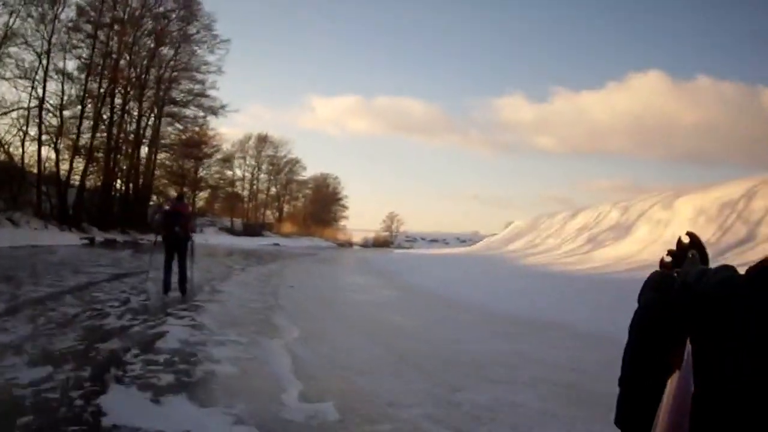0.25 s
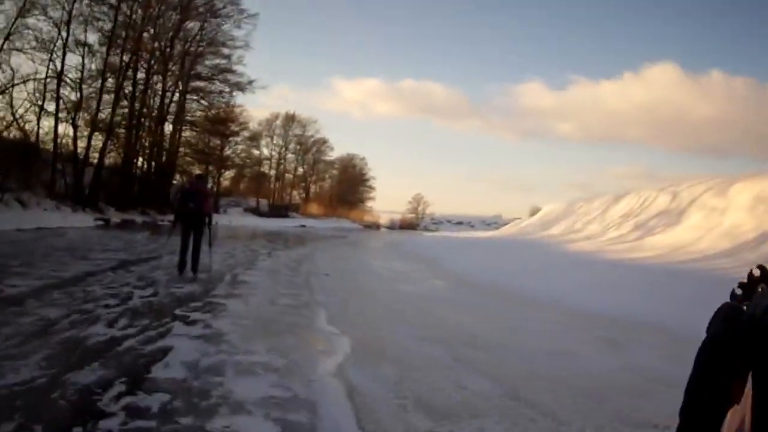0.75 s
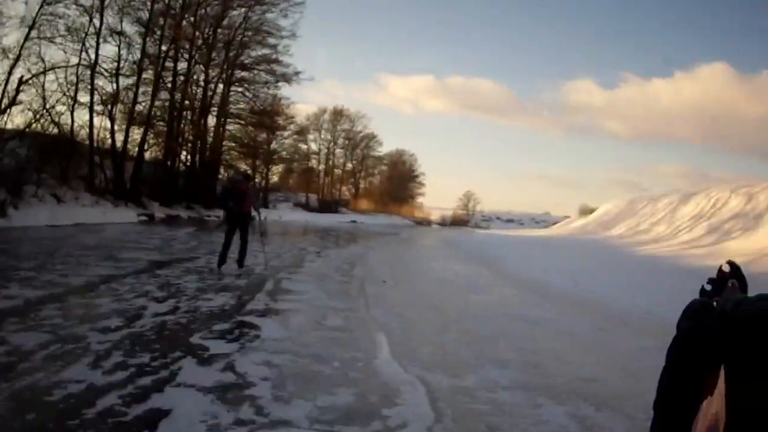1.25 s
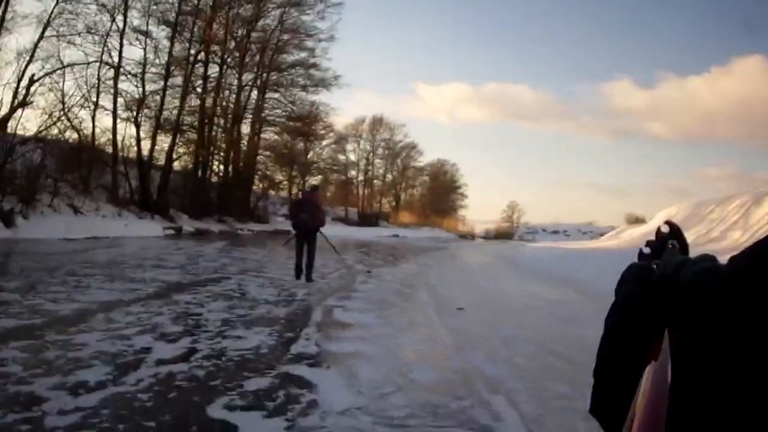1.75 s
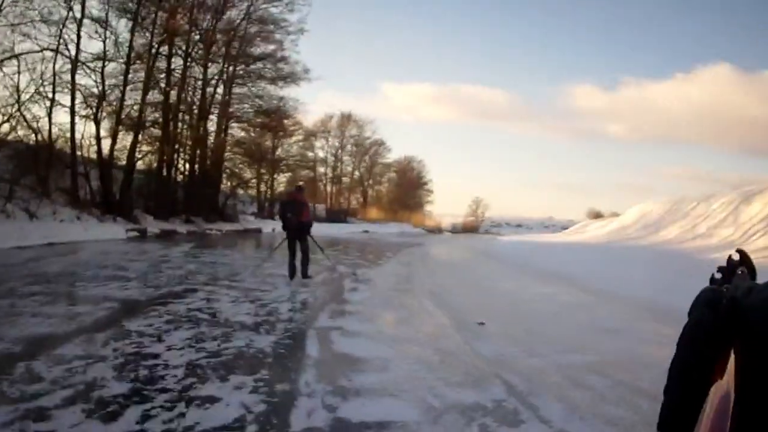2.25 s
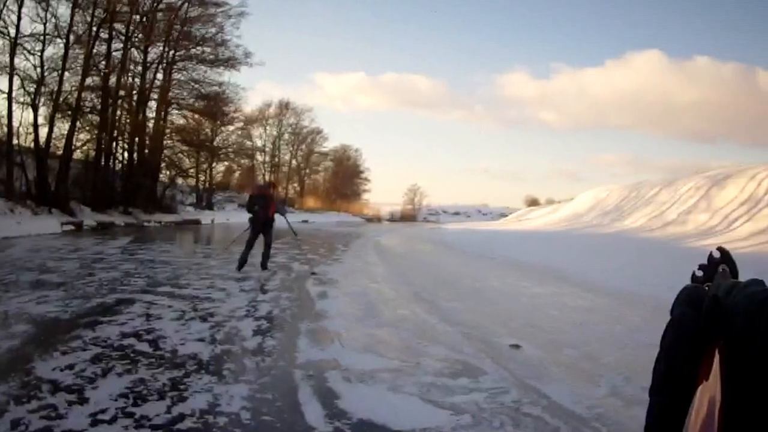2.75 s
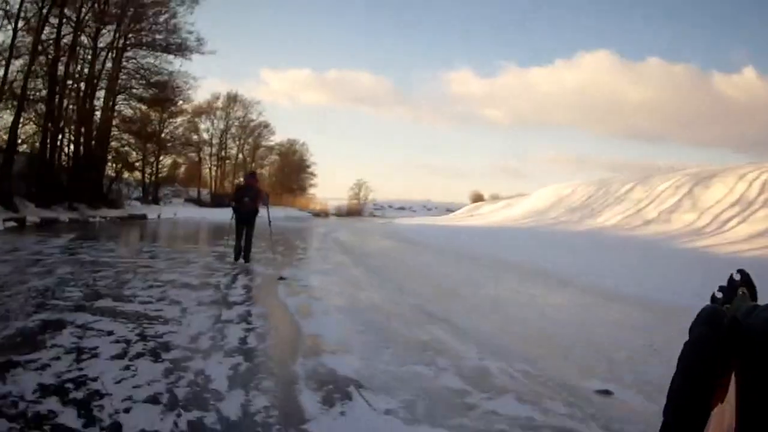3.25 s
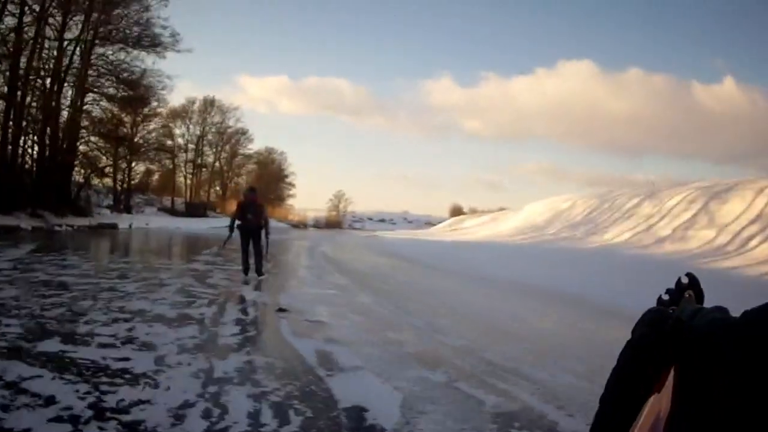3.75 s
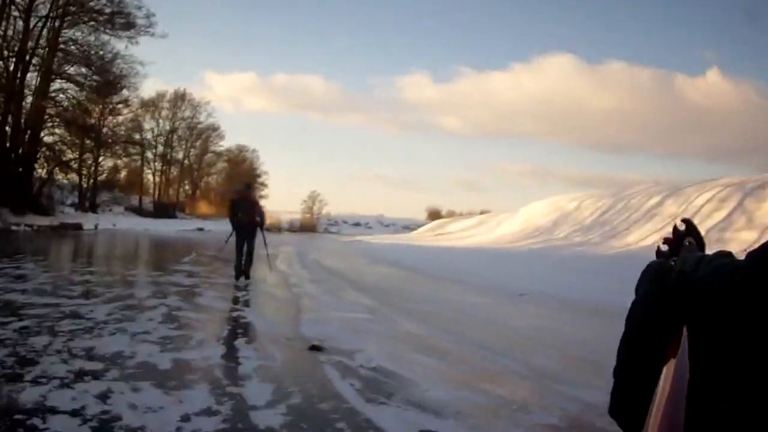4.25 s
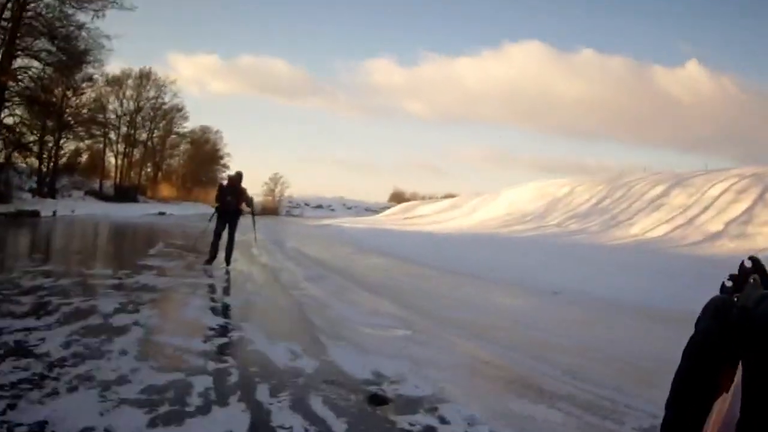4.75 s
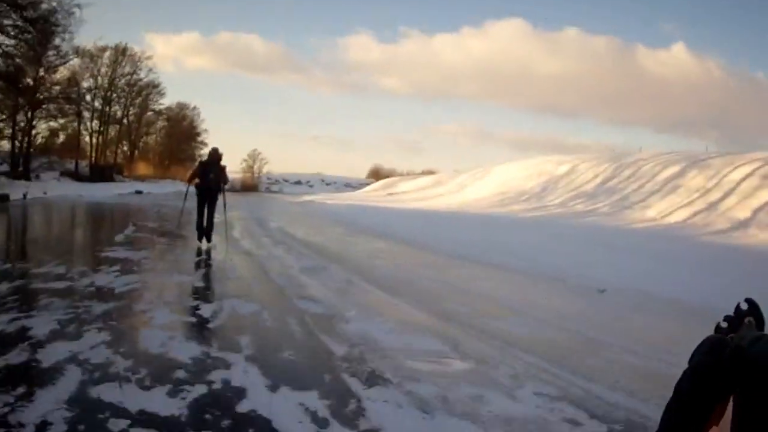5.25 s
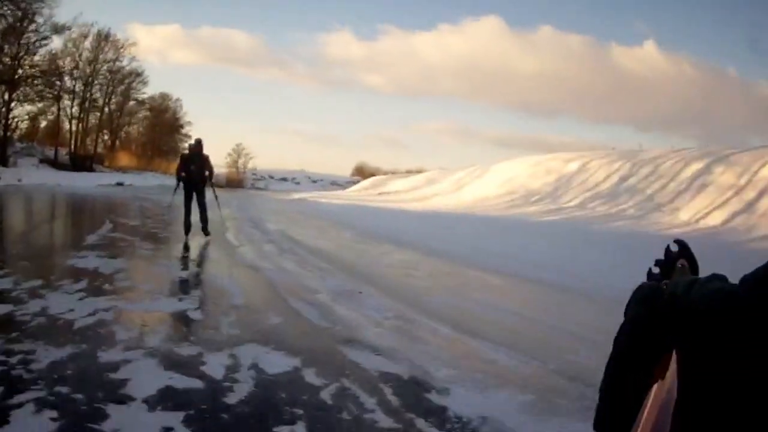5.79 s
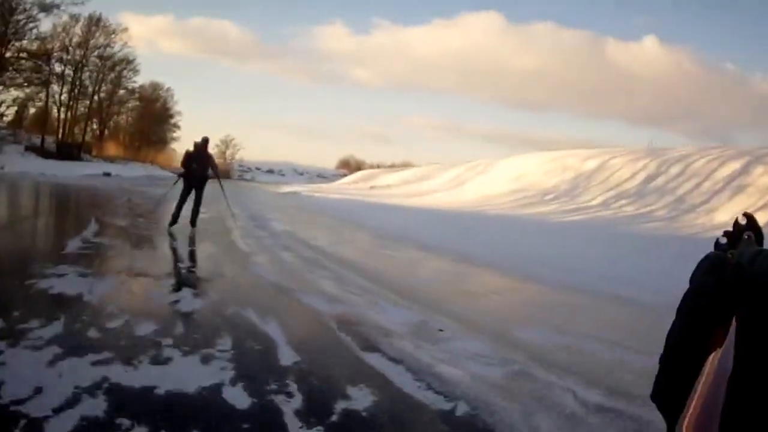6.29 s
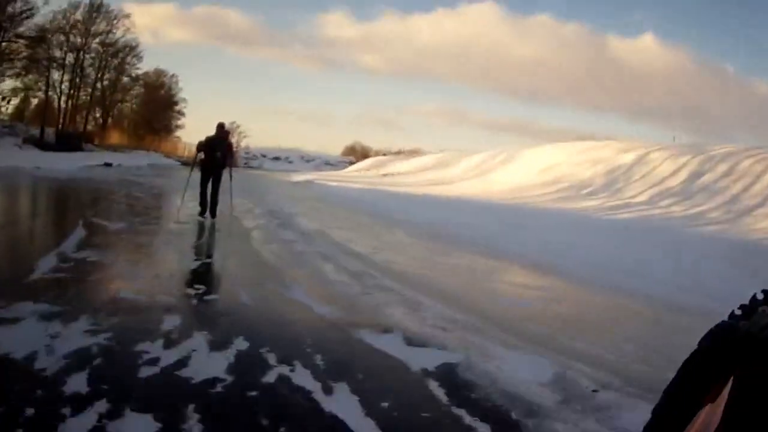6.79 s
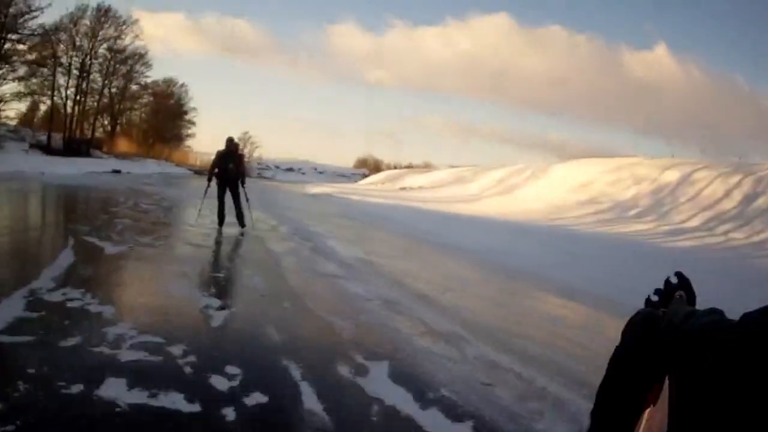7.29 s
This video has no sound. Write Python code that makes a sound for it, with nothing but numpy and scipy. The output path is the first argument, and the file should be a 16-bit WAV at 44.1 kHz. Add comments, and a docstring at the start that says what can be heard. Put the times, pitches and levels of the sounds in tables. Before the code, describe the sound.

Skate blades scrape and glide over ice with sharp pole and blade clicks, above a steady low electrical buzz and hiss.

```python
"""Skates grind and glide over river ice, heard through a small action camera's closed case.
The steel edges crush ice grains, which ring the case; now and then an edge squeaks.
Blades and pole tips tick on the ice sheet, and a boot stamps once.
Behind them: the camera circuits' frame-rate buzz and thin whine, and steady hiss."""
import sys
import numpy as np
from scipy import signal
from scipy.fft import rfft, irfft
from scipy.io import wavfile
from scipy.ndimage import uniform_filter1d

SR = 44100
rng = np.random.default_rng(int(sys.argv[2]) if len(sys.argv) > 2 else 0)


def dump_mix(stems):
    """Bounce the given channels to the path in sys.argv[1] as a 16-bit WAV at rate SR."""
    frames = np.atleast_2d(stems).T  # one column per channel
    limited = np.clip(frames, -1, 1)  # hard clip at full scale
    pcm = np.round(limited * 32767).astype(np.int16)
    wavfile.write(sys.argv[1], SR, pcm)


N = 332073
T = np.arange(N) / SR

# Hiss spectrum. Each row: frequency in Hz, relative density in dB.
HISS_SPECTRUM = [(20, 17.5), (33, 4), (50, 3), (200, 8), (700, -8.5), (1100, -12.5), (2000, -3),
                 (3000, -20.5), (6500, -14), (9000, -21), (11000, -3.5), (12500, -14), (15000, -17)]
# Steady circuit tones. Each row: frequency in Hz, rms level in dB.
CIRCUIT_TONES = [(46.9, -68), (53.1, -67), (11089.6, -74)]
# Current bursts over a three-frame cycle. Each entry: length in seconds; below, its jitter in seconds.
BURST_S = [0.0018, 0.00417, 0.0016]
BURST_JITTER_S = [0.00031, 0.000089, 0.00016]
# Current steps closing a burst. Each row: offset from its end in seconds, share of the mean load.
CLOSING_STEPS = [(-.0007, 0.26), (0, -0.55)]
# Blade and pole blows. Each row: start in seconds, case peak in dB, ice ring in dB re case,
# ice ring in Hz, crack in dB re case.
BLOWS = [(.0114, -50, 3, 1170, -7), (.0333, -47, -4, 990, -13), (.0865, -36, 2, 1470, -6),
         (.1181, -46, -15, 1040, -4), (.2184, -38, -21, 1260, -14), (.2648, -41.5, -19, 837, -14),
         (.3092, -36, -8, 1610, -4), (.3534, -41.5, -13, 1490, -16), (.6898, -41.5, -19, 961, -9),
         (.7916, -47, -17, 1020, -16), (.8274, -49, 6, 1650, -17), (.8535, -40, -8, 1540, -6),
         (.9168, -35.5, -1.5, 1460, -4), (.9393, -43, -21, 961, -18), (1.1564, -44, -3, 1450, -14),
         (1.1822, -41.5, -13, 1530, -11), (1.7364, -40, -1.5, 1530, -17), (1.9619, -49.5, 5, 1640, -15),
         (2.0223, -40.5, -4, 1130, -8), (2.0892, -50, 3, 980, -10), (2.262, -56, -9, 1070, 3),
         (2.2842, -47, -4, 1070, 0), (2.4099, -47.5, 1.5, 1090, -12), (2.4623, -45, -2, 1650, 3.5),
         (2.566, -45, -1, 1640, 0), (2.5774, -45.5, -30, 894, 7), (2.7711, -52.5, 6, 1490, -19),
         (2.9986, -43, -18, 1010, 7.5), (3.027, -47, -16, 1280, -1), (3.2395, -50, -15, 1340, -11),
         (3.4516, -33, -19, 1530, -9), (3.707, -41, -13, 1250, -6), (4.099, -50, -15, 960, 0),
         (4.1334, -50.5, 2, 958, -16), (4.2268, -46.5, -21, 823, -2), (4.4742, -47, -3, 1110, -7),
         (4.9377, -45, -20, 848, -14), (4.9724, -44.5, 1.5, 1060, -11), (5.02, -45, -15, 1040, -14),
         (5.0654, -57, -20, 910, 12), (5.2085, -39, -21, 1370, -6), (5.3911, -50, -8, 980, 8.5),
         (5.4655, -43.5, -12, 1060, -16), (5.5149, -45.5, -11, 850, 0), (5.8626, -49, 7.5, 1610, 0),
         (5.9125, -43.5, -8, 1610, -6), (5.9743, -36.5, -11, 1630, -3), (6.0354, -42, -8, 1210, -1),
         (6.0564, -47, -17, 910, 0), (6.1554, -49, -6, 890, 4), (6.2018, -37.5, -16, 1200, -2),
         (6.5051, -29, -18, 1650, 6), (6.5296, -25, -12, 1670, -10), (6.6413, -22, -23, 1610, -4),
         (6.8294, -38, -17, 1510, 4), (6.9144, -40, -1, 1610, -2), (6.941, -33, -9, 1000, 11),
         (7.3118, -44, -0.5, 1630, -3)]
# Edge squeaks. Each row: start in seconds, length in seconds, pitch in Hz, rms level in dB.
EDGE_SQUEAKS = [(0.802, 0.068, 4900, -77), (1.395, 0.033, 2750, -66), (1.68, .05, 4900, -69),
                (4.1, .025, 4950, -71), (5.725, 0.05, 4760, -62)]
# Running blades. Each row: time in seconds, mid ring in dB, low ring in dB re mid.
GLIDE_LEVELS = [(0.0, -68, 4), (0.33, -65, 5), (0.88, -74, 9), (1.15, -67.5, 8), (1.4, -76, 3),
                (1.76, -65.5, 5), (1.93, -75, 7), (2.35, -71.5, 2), (2.93, -74, 11), (3.29, -69, 4),
                (4.32, -78, 5), (5.08, -71, 9.5), (5.2, -76, 5), (6.02, -80, 14.5), (6.33, -69, 1),
                (6.63, -65.5, 5.5), (7.26, -74, 9.5), (7.53, -65, 4)]
# Edge scrapes. Each row: time of full bite, rise, hold and fall in seconds, mid gain in dB,
# then body, low and top gain in dB re mid.
SCRAPES = [(.002, .01, .003, 0.035, -60, -15, 3, 1.5), (0.186, 0.061, .003, 0.061, -53, -10, 3, -5.5),
           (0.447, .015, 0.094, 0.038, -61.5, -15, 5.5, -1), (0.603, .05, 0.093, .025, -70, -13, 2, -10),
           (0.929, .02, 0.039, 0.088, -60, -3, 10, -2.5), (1.107, 0.16, 0.03, 0.036, -51, -5.5, 8, -6.5),
           (1.183, 0.0042, .003, 0.009, -53, -8, -5, -12), (1.286, 0.073, 0.07, 0.011, -47.5, -8, 9, -4),
           (1.391, 0.033, 0.0024, 0.019, -54, -5, -2, 0), (1.484, 0.05, .07, .03, -64.5, -8, 5.5, -3),
           (1.586, 0.019, 0.027, 0.085, -55, -9, 2.5, -4.5), (1.76, 0.14, 0.027, 0.055, -59, -12, 7.5, 0),
           (1.874, 0.058, 0.022, .035, -57, -7, 3.5, -1), (2.095, 0.017, .003, .06, -58, -11, 2, 0.5),
           (2.197, 0.033, .003, 0.12, -54.5, -11, 4, -4.5), (2.33, 0.068, 0.056, 0.015, -52, -5.5, 5, -4),
           (2.462, 0.068, .003, 0.041, -65.5, -11, 11.5, -6), (2.6, 0.047, 0.023, 0.033, -65, -3, 6.5, -4),
           (2.66, 0.021, 0.032, 0.043, -50.5, -8, 1, -7.5), (2.9, 0.04, 0.053, .05, -60.5, -7, 6.5, -6),
           (3.024, 0.024, 0.0027, 0.024, -48.5, -6.5, 1, -14), (3.131, 0.025, .03, 0.072, -51, -6, 4, -3),
           (3.264, 0.044, 0.033, 0.048, -50, -3, 7.5, -4), (3.388, 0.02, 0.018, 0.06, -56.5, -2, 8, -1),
           (3.458, 0.057, 0.029, 0.039, -45, -3.5, 4, -5), (3.577, 0.024, 0.038, 0.038, -63, 3, 6.5, -5),
           (3.72, 0.045, 0.0019, 0.067, -56.5, -1, 8, -6.5), (3.864, 0.042, .05, 0.13, -45, -7.5, 1.5, -9),
           (3.991, 0.12, 0.048, 0.0087, -51.5, -11, 2, -1.5),
           (4.564, 0.029, 0.053, .08, -60.5, -23, -2.5, -8),
           (4.795, .007, 0.043, .03, -35, -16.5, -0.5, -11.5),
           (4.849, 0.034, 0.0097, 0.019, -44.5, -17, -6, -11),
           (5.075, 0.016, 0.054, 0.17, -60.5, -4, 4.5, -3.5),
           (5.211, 0.031, 0.02, 0.033, -39, -10.5, 0, -9.5),
           (5.256, 0.035, .035, 0.031, -46.5, -7, -0.5, -6.5), (5.308, .05, .003, 0.15, -58.5, -2.5, 6, -6),
           (5.568, .065, 0.022, 0.24, -55.5, -5, 4, -5), (5.73, 0.092, 0.058, 0.027, -77, 9, -8, 12.5),
           (6, 0.03, .003, 0.024, -46.5, -9.5, 2, -5.5), (6.2, .06, 0.12, 0.097, -73, -12, 2, -6),
           (6.336, 0.17, 0.011, 0.024, -63, -16, -1, -9), (6.409, 0.062, 0.032, .04, -54, -12, -1, -12),
           (6.47, 0.02, .02, 0.054, -41, -11, -2.5, -10.5),
           (6.511, 0.019, 0.029, 0.043, -35.5, -14.5, 2, -10.5),
           (6.579, 0.056, 0.039, .04, -44.5, -10.5, 6, 1.5),
           (6.627, 0.029, 0.027, 0.029, -34, -16.5, 2, -10),
           (6.75, 0.012, 0.015, 0.072, -51.5, -28, -7, -8.5),
           (6.827, 0.064, 0.0028, 0.02, -51.5, -9, 5.5, -0.5),
           (6.922, 0.034, 0.027, 0.065, -41, -15, -2, -4),
           (6.934, 0.015, 0.0075, 0.0078, -27.5, -17, -4.5, -12.5),
           (7.046, .05, 0.036, 0.055, -63.5, -18, 2, -5), (7.16, .015, 0.023, 0.025, -64, -8, 4, -7),
           (7.23, 0.04, .003, .06, -56, -10, 6, -2), (7.457, 0.074, 0.082, .05, -72.5, -15, 6, -6)]
# Case resonances in five ascending bands. Each row: centre in Hz, width in Hz, relative gain in dB.
BODY_MODES = [(1280, 315, 6.5), (1030, 240, -2.5), (643, 610, -4)]
LOW_MODES = [(1745, 324, -3), (1977, 266, 6), (2283, 460, -5.5)]
MID_MODES = [(2780, 400, -6.5), (3208, 490, 0.5), (3734, 310, -0.5), (4180, 600, -8.5)]
HIGH_MODES = [(5006, 310, -1), (5436, 280, -1.5), (5910, 290, 2), (6426, 320, -5), (7370, 620, -2)]
TOP_MODES = [(8450, 1300, -2), (9860, 1100, -0.5), (10850, 1200, -3.5), (12160, 860, -8.5),
             (13300, 830, -3.5), (14600, 700, -7)]
# Hard push-offs. Each row: start in seconds, end in seconds.
PUSH_OFFS = [(4.75, 4.95), (6.25, 7.1)]
# Case resonances in a push-off. Each row: centre in Hz, width in Hz, relative gain in dB.
PUSH_BODY_MODES = [(1350, 690, 2.5), (656, 350, -4)]
PUSH_LOW_MODES = [(1898, 300, 1), (2352, 250, -1.9)]
PUSH_MID_MODES = [(2710, 1800, -2.5), (3437, 380, 5), (3920, 1100, -15.5)]
PUSH_HIGH_MODES = [(5260, 800, 8), (5950, 270, -3.5), (6840, 1400, -1)]
PUSH_TOP_MODES = [(8290, 1040, 0.5), (10150, 1600, -0.5), (11000, 960, -0.5), (13200, 4400, -4)]

GRAINS_PER_S, GRAIN_SCATTER_DB = 7000, 3.5


def undb(db):
    return 10 ** (np.asarray(db) / 20)


def at_rms(x, db):
    return x * undb(db) / np.sqrt(np.mean(x ** 2))


def unit_peak(x):
    return x / np.abs(x).max()


def wander(rate_hz):
    """Random levels joined by ramps; spread near 1."""
    hold = int(SR / rate_hz)
    return uniform_filter1d(np.repeat(rng.standard_normal(N // hold + 1), hold), hold)[:N]


def resonate(x, hz, width_hz):
    """One resonance, unity gain at its centre."""
    return signal.lfilter(*signal.iirpeak(hz, hz / width_hz, SR), x)


def ring(x, modes, wander_db=0):
    """Resonator bank, normalised for white noise; two passes per mode keep the valleys dark."""
    impulse = signal.unit_impulse(4096)
    out = response = 0
    for k, (hz, width_hz, db) in enumerate(modes):
        gain = (-1) ** k * undb(db)
        drive = x * undb(wander_db * wander(13)) if wander_db else x
        out += gain * resonate(resonate(drive, hz, width_hz), hz, width_hz)
        response += gain * resonate(resonate(impulse, hz, width_hz), hz, width_hz)
    return out / np.sqrt(np.sum(response ** 2))


def grains(per_s, scatter_db):
    """Random clicks, a few much larger than the rest."""
    occur, polarity, size = rng.random((3, N))
    excess = np.minimum(-np.log(1 - size), 4)
    return (occur < per_s / SR) * np.sign(polarity - .5) * undb(scatter_db * excess)


def hiss(rms_db=-59.5):
    """Steady noise of microphone and air."""
    hz, db = np.transpose(HISS_SPECTRUM)
    bin_hz = np.maximum(np.fft.rfftfreq(N, 1 / SR), 1)
    shape = undb(np.interp(np.log(bin_hz), np.log(hz), db))
    return at_rms(irfft(rfft(rng.standard_normal(N)) * shape, N), rms_db)


def whine(scan_hz=7867.15, flip_hz=30.025, scan_db=-66.5):
    """A scan tone that flips sign every field, twice per flip cycle, plus steady tones."""
    flip = np.tanh(30 * np.sin(2 * np.pi * flip_hz * T)) + 0.17
    scan = resonate(flip * np.sin(2 * np.pi * scan_hz * T), 8400, 700)
    tones = sum(np.sqrt(2) * undb(db) * np.sin(2 * np.pi * hz * T) for hz, db in CIRCUIT_TONES)
    return at_rms(scan, scan_db) + tones


def buzz(frame_hz=59.944, first_end_s=.0151, release_s=.00088, coupling_hz=68, rms_db=-49):
    """Supply current bursts once a frame and leaks in through the input's coupling capacitor."""
    frame = np.arange(int(N / SR * frame_hz) + 1)
    end_draw, start_draw, load_draw = rng.standard_normal((len(frame), 3)).T
    end_s = first_end_s + frame / frame_hz + .00005 * end_draw
    start_s = end_s - np.take(BURST_S, frame % 3) + np.take(BURST_JITTER_S, frame % 3) * start_draw
    load = 1 + 0.13 * load_draw
    closing = [(end_s + offset_s, share) for offset_s, share in CLOSING_STEPS]
    remaining = load + sum(share for _, share in CLOSING_STEPS)
    steps = np.zeros(N + SR)
    for at_s, size in [(start_s, load), (end_s + release_s, -remaining)] + closing:
        np.add.at(steps, (at_s * SR).astype(int), size)
    current = np.cumsum(steps)[:N]
    leak = signal.lfilter(*signal.butter(1, coupling_hz, "high", fs=SR), current)
    leak = signal.lfilter(*signal.butter(1, 15, "high", fs=SR), leak)
    leak = signal.lfilter(*signal.butter(2, 1050, "low", fs=SR), leak)
    return at_rms(leak, rms_db)


def boot_stamp(start_s=3.478, db=-47, hz=250, decay_s=.012):
    """A dull, quickly damped thump in the ice sheet."""
    t = np.maximum(T - start_s, 0)
    return undb(db) * np.sin(2 * np.pi * hz * t) * np.exp(-t / decay_s)


def knocks(mean_case_hz=2050, rise_s=.0008, crack_decay_s=.00091):
    """Each blow is a short crunch that rings case and ice sheet, with a bright crack in front."""
    out = np.zeros(N + SR)
    t = np.arange(SR // 20) / SR
    for start_s, db, ice_db, ice_hz, crack_db in BLOWS:
        noise = rng.standard_normal(len(t))
        case_hz = mean_case_hz * (1 + .025 * noise[0])
        decay_s = .0028 * np.exp(.039 * ice_db)  # more ice ring, longer crunch
        crunch = noise * (1 - np.exp(-t / rise_s)) * np.exp(-t / decay_s)
        case = ring(resonate(crunch, case_hz, 700), [(case_hz, 230, 0), (0.855 * case_hz, 300, -9)])
        ice = ring(resonate(crunch, ice_hz, 900), [(ice_hz, 400, 0), (0.75 * ice_hz, 350, -9)])
        snap = noise * np.exp(-t / crack_decay_s)
        crack = ring(snap, MID_MODES) + 0.47 * ring(snap, HIGH_MODES) + 0.48 * ring(snap, TOP_MODES)
        blow = unit_peak(case) + undb(ice_db) * unit_peak(ice) + undb(crack_db) * unit_peak(crack)
        i = int(start_s * SR)
        out[i:i + len(t)] += undb(db) * blow
    return out[:N]


def squeaks(ramp_s=.0016, width_hz=110):
    """The edge catches briefly and sings on one rough note."""
    out = np.zeros(N)
    for start_s, length_s, hz, db in EDGE_SQUEAKS:
        gate = np.clip(np.minimum(T - start_s, start_s + length_s - T) / ramp_s, 0, 1)
        out += undb(db) * gate * ring(rng.standard_normal(N), [(hz, width_hz, 0)])
    return out


def glide(chips_per_s=36):
    """Running blades hiss faintly and unevenly; stray chips ping the case."""
    at_s, mid_db, low_db = np.transpose(GLIDE_LEVELS)
    low_gain, mid_gain, top_gain = (undb(np.interp(T, at_s, mid_db + db)) for db in (low_db, 0, 1))
    run = at_rms(grains(GRAINS_PER_S, GRAIN_SCATTER_DB), 0) * undb(1.8 * wander(30))
    chips = undb(9) * grains(chips_per_s, scatter_db=0.9)
    treble_modes = TOP_MODES + [(hz, width_hz, db - 9) for hz, width_hz, db in HIGH_MODES]
    low = ring((run + chips) * low_gain, LOW_MODES + [(1210, 2200, 0.5)])
    mid = ring((run + 0.1 * chips) * mid_gain, MID_MODES)
    top = ring((run + 0.12 * chips) * top_gain, treble_modes)
    return low + mid + top


def bite_gains(flank_db=20, flank_power=1.3):
    """Each scrape rises to full bite, holds and lets go. Rows: mid, body, low, high, top gain."""
    gains = np.zeros((5, N))
    for bite_s, rise_s, hold_s, fall_s, mid_db, body_db, low_db, top_db in SCRAPES:
        span = slice(max(int((bite_s - 3 * rise_s) * SR), 0), int((bite_s + hold_s + 3 * fall_s) * SR))
        t = T[span] - bite_s
        flank = np.maximum(-t / rise_s, (t - hold_s) / fall_s)
        fade_db = flank_db * np.maximum(flank, 0) ** flank_power
        high_db = -4.5 + 0.77 * top_db
        band_db = mid_db + np.array([0, body_db, low_db, high_db, top_db])
        gains[:, span] += undb(band_db[:, None] - fade_db)
    return gains


def scrapes(chatter_db=1.53, chatter_hz=90):
    """The steel edge bites, chatters and crushes dense ice grains; each part of the case rings."""
    pushing = sum((T > start_s) & (T < end_s) for start_s, end_s in PUSH_OFFS)
    crush = at_rms(grains(GRAINS_PER_S, GRAIN_SCATTER_DB), 0)
    crush *= undb(chatter_db * wander(chatter_hz) + 0.28 * wander(30))
    parts = [(MID_MODES, PUSH_MID_MODES, -.3), (BODY_MODES, PUSH_BODY_MODES, -.3),
             (LOW_MODES, PUSH_LOW_MODES, -.3), (HIGH_MODES, PUSH_HIGH_MODES, 1.5),
             (TOP_MODES, PUSH_TOP_MODES, 2.5)]
    out = np.zeros(N)
    for gain, (modes, push_modes, trim_db) in zip(bite_gains(), parts):
        signs = rng.choice([-1., 1.], N)  # same grains, a separate path to each part
        shake = crush * signs * gain * undb(trim_db + 0.9 * wander(45))
        out += ring(shake * (1 - pushing), modes, wander_db=1.8)
        out += ring(shake * pushing, push_modes, wander_db=3.1)
    return out


def scene():
    """Skating over buzz, whine and hiss; mono."""
    skating = scrapes() + glide() + squeaks() + knocks() + boot_stamp()
    return (skating + buzz() + whine() + hiss())[None]


def record(dry, mic_hz=15250, cutoff_hz=15600):
    """The microphone path rolls off near the top; the recorder cuts steeply just above."""
    mic = signal.sosfilt(signal.ellip(6, .3, 30, mic_hz, fs=SR, output="sos"), dry)
    return signal.sosfilt(signal.ellip(14, .2, 70, cutoff_hz, fs=SR, output="sos"), mic)


dry = scene()
out = record(dry)
dump_mix(out)
```